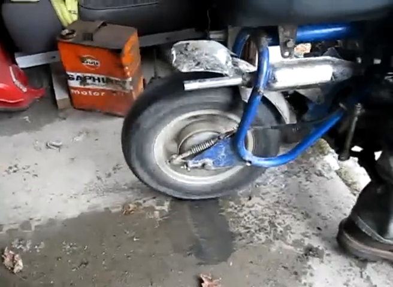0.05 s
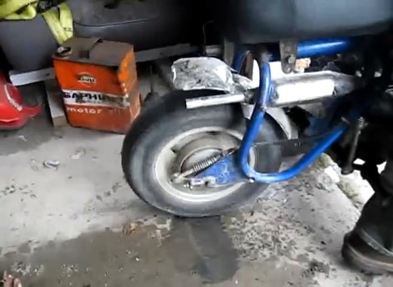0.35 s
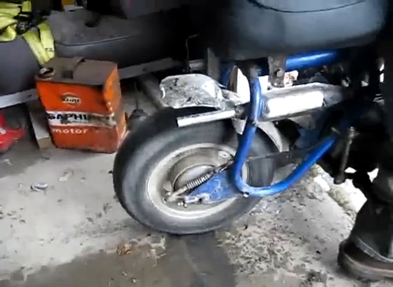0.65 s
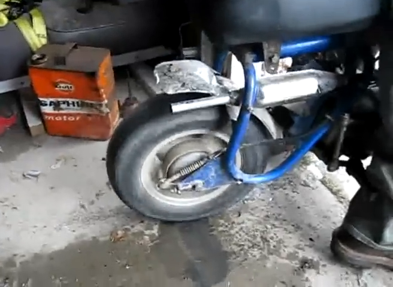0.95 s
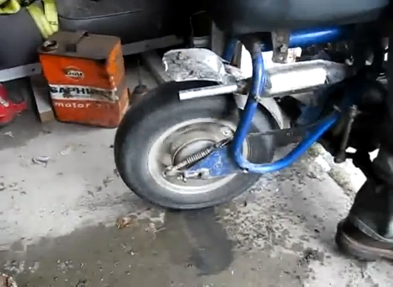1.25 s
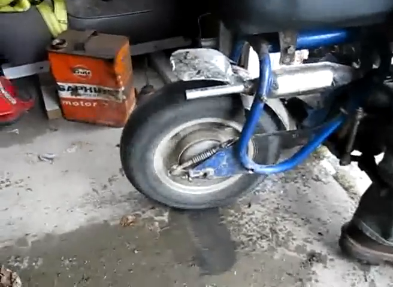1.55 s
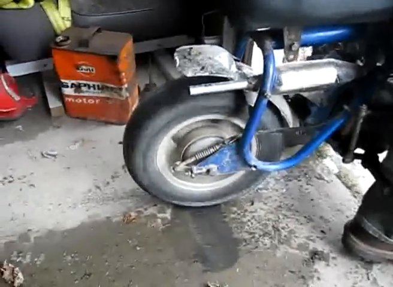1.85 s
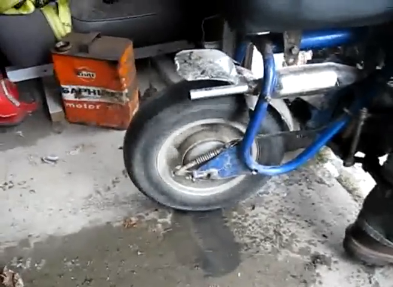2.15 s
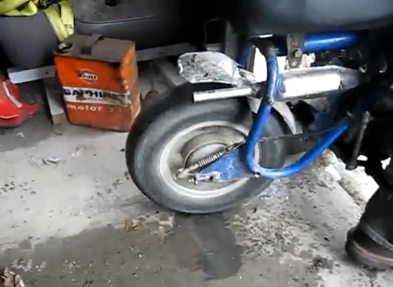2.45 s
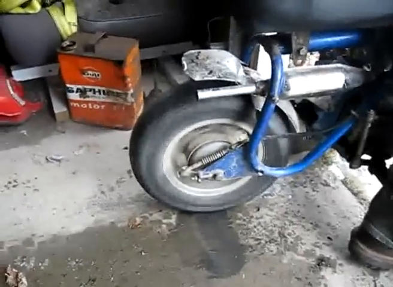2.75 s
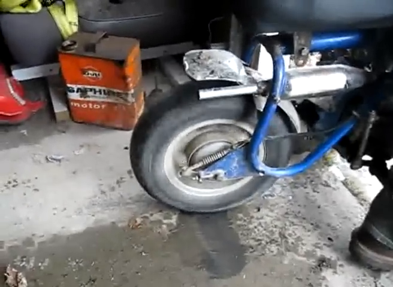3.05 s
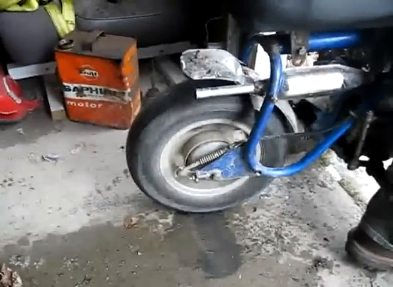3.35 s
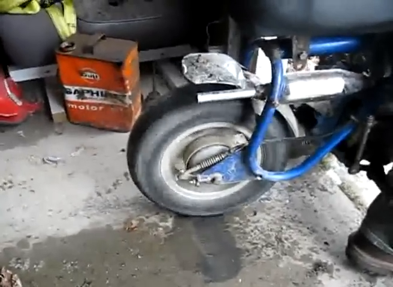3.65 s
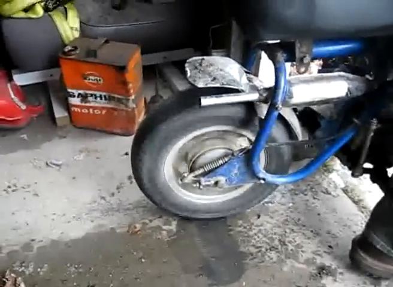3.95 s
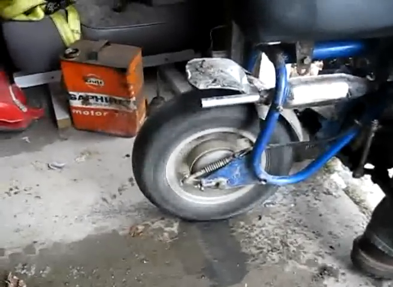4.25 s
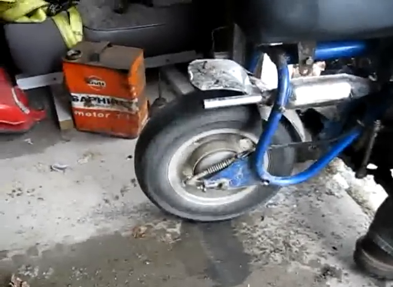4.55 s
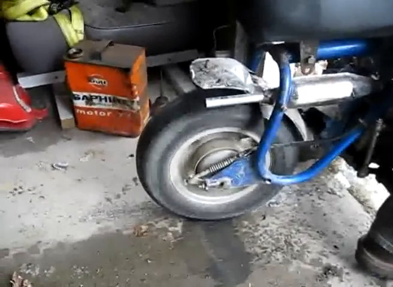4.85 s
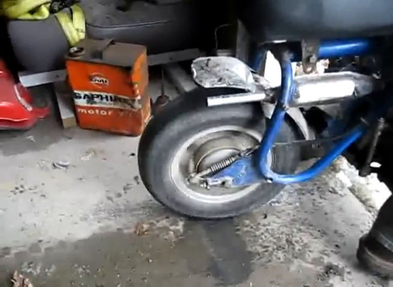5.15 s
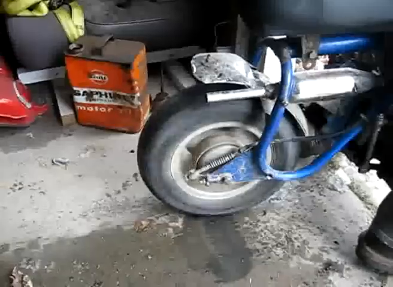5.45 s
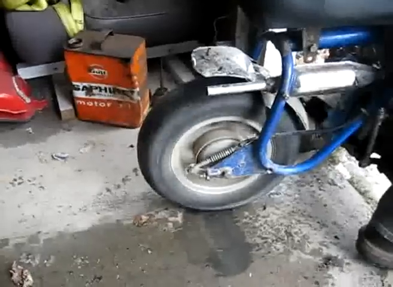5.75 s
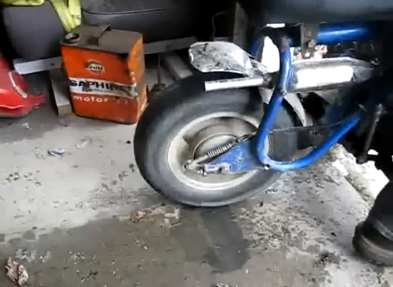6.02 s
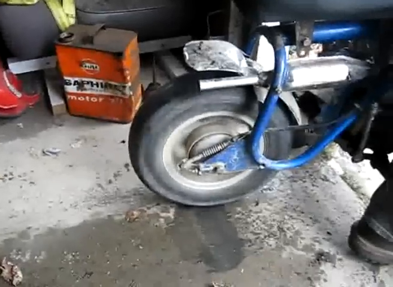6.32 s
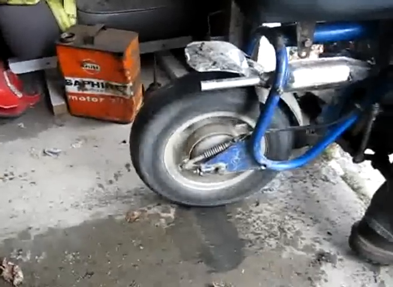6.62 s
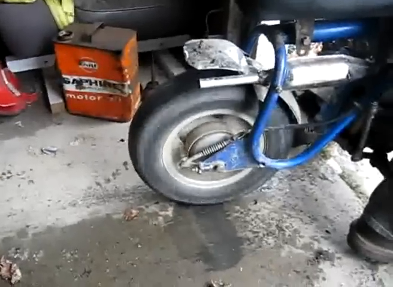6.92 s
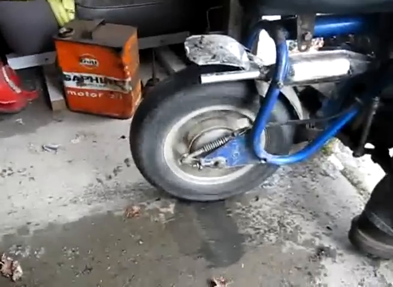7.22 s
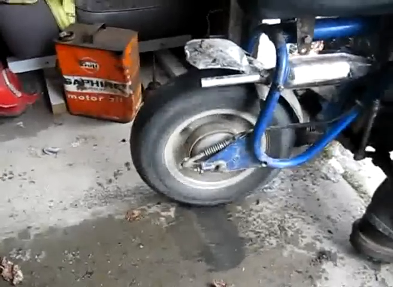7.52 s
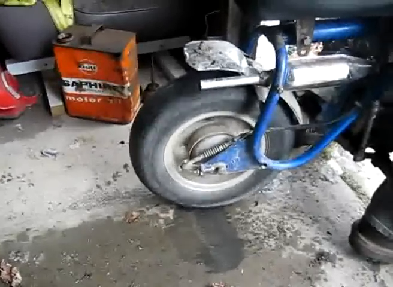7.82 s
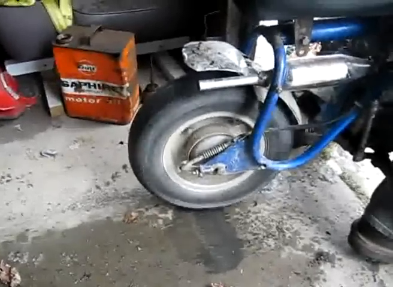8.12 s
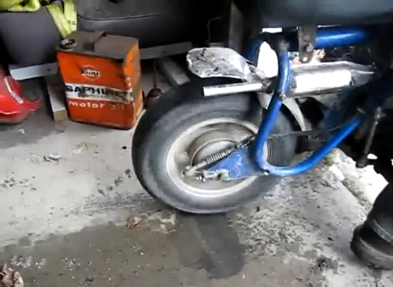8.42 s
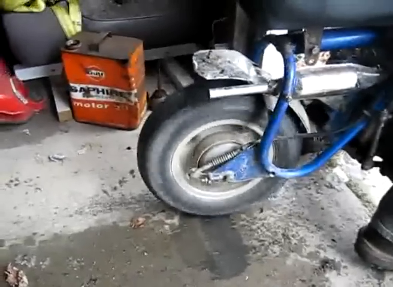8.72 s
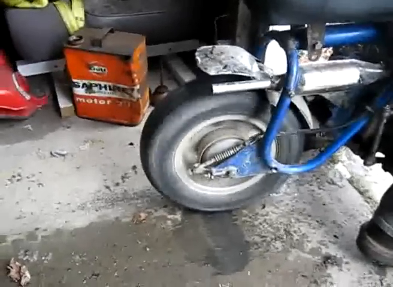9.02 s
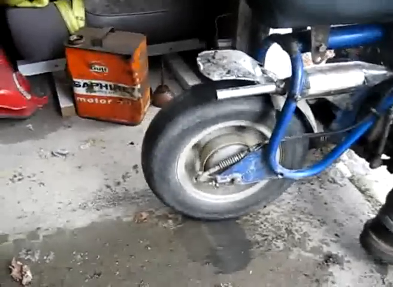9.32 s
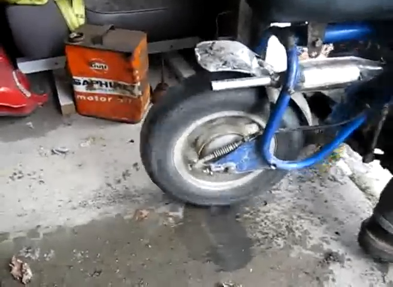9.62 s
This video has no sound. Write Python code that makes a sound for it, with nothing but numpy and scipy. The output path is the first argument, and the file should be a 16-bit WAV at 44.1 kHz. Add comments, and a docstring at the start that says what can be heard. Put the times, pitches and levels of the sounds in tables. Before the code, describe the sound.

A small single-cylinder minibike engine revs high with exhaust pops while its spinning rear tire hisses on wet concrete.

```python
"""A minibike's small four-stroke single is held at high revs while its rear tyre spins on wet concrete.
From the start each firing drives the exhaust note, a puff of gas and a run of valve and piston knocks.
The revs climb for four seconds, and the intake honks as harmonics meet its resonances. From two seconds
on, stray charges pop loudly in the pipe; they keep popping as the revs sag to the end. A small camera
close by takes it all in through a narrow, slightly hissy channel."""
import sys
import numpy as np
from scipy import signal
from scipy.fft import rfft, irfft, next_fast_len
from scipy.io import wavfile
from scipy.ndimage import uniform_filter1d

SR = 44100
rng = np.random.default_rng(int(sys.argv[2]) if len(sys.argv) > 2 else 0)


def master_out(mix):
    """Clip the mix to full scale and print it as 16-bit PCM to the path in sys.argv[1]."""
    frames = np.transpose(np.atleast_2d(mix))
    ceiling = np.clip(frames, -1, 1)
    pcm = np.round(ceiling * 32767).astype(np.int16)
    wavfile.write(sys.argv[1], SR, pcm)


N = 431298
TIME = np.arange(N) / SR
CRUISE_HZ = 67  # middle of the range of firing rates


def undb(db):
    """Decibels to amplitude ratio."""
    return 10 ** (np.asarray(db) / 20)


def unit(x):
    """Normalisation to rms 1."""
    return x / np.sqrt(np.mean(x ** 2))


def walk(rate_hz):
    """Low-pass random fluctuation: held values, smoothed twice; spread near 1."""
    hold = int(SR / rate_hz)
    steps = np.repeat(rng.standard_normal(N // hold + 1), hold)
    return 1.3 * uniform_filter1d(uniform_filter1d(steps, hold), hold)[:N]


def colour(x, spectrum):
    """Spectral shaping through (frequency_hz, gain_db) points; rms 1."""
    hz, db = np.transpose(spectrum)
    size = next_fast_len(N)
    bins_hz = np.arange(size // 2 + 1) * SR / size
    gain = undb(np.interp(np.log(bins_hz + 1), np.log(hz), db))
    return unit(irfft(rfft(x, size) * gain, size)[:N])


def ring(x, modes):
    """Modal superposition: damped resonances, neighbours in opposite sign; rms 1."""
    return unit(sum((-1) ** k * undb(db) * signal.lfilter(*signal.iirpeak(hz, hz / width, fs=SR), x)
                    for k, (hz, width, db) in enumerate(modes)))


def response(hz, modes):
    """Magnitude response of steep-sided resonances, summed in power."""
    return np.sqrt(sum((undb(db) / (1 + ((hz - f) / width) ** 4)) ** 2 for f, width, db in modes))


def clicks(times, sizes):
    """Impulse train; linear interpolation shares each impulse between two samples."""
    at = np.clip(times * SR, 0, N)
    i = at.astype(int)
    before = np.bincount(i, sizes * (1 - at + i), N + 2)
    after = np.bincount(i + 1, sizes * (at - i), N + 2)
    return (before + after)[:N]


# Spectrum of the wet tyre: frequency_hz, gain_db
TYRE_SPECTRUM = [(30, -12), (150, -8), (400, -11), (800, -6), (1200, -3), (1800, -0.5), (2450, 2.5),
                 (2950, 2.5), (3550, -2), (4000, 1.5), (4700, -1), (5300, -2.5)]


def tyre(grain_db=0.7, wander_db=0.8):
    """Friction noise: rubber scrubs over wet grit in a dense, grainy hiss."""
    noise = rng.standard_normal(N)
    roughness = undb(-grain_db * walk(900) + wander_db * walk(12))
    return colour(noise * roughness, TYRE_SPECTRUM)


# Crack of the opening valve and its reflections in the silencer: delay_s, relative_pressure
VALVE_CRACKS = [(.0002, 1), (.0023, -.9), (.0036, .9), (.0046, -.9), (.0065, .6), (.0093, -.45)]
# Spectrum of the exhaust gas: frequency_hz, gain_db
JET_SPECTRUM = [(150, -1), (400, 6), (800, 6), (1200, -10.5), (1700, -21.5), (2500, 4.5), (2900, -1.5),
                (3450, 7), (4100, 9.5), (4750, -9), (5300, 4.5)]
# Modes of the silencer's thin steel: frequency_hz, bandwidth_hz, gain_db
SILENCER_MODES = [(3316, 48, 3.5), (3605, 100, 2), (4330, 66, 1), (4606, 107, 5.5), (4843, 74, 6.5),
                  (5100, 310, -1.5)]


def exhaust_gas(cycles, firings, open_share=0.05, fade_share=0.35, steel_db=-5, crack_db=-5):
    """Jet noise: once a cycle the valve cracks open and a puff of gas dies away; both ring the steel."""
    age = cycles % 1
    puff = unit((1 - np.exp(-age / open_share)) * np.exp(-.5 * (age / fade_share) ** 2))
    crack = 0
    for delay_s, pressure in VALVE_CRACKS:
        drift_s = .00002 * np.interp(firings, TIME, walk(3))  # the speed of sound varies in hot gas
        crack += clicks(firings + delay_s + drift_s, pressure)
    tailpipe = signal.butter(4, 1000, "high", fs=SR, output="sos")  # narrow: passes only the sharp edge
    crack = undb(crack_db) * unit(signal.sosfilt(tailpipe, crack))
    jet, shell = puff * rng.standard_normal((2, N)) + crack
    return colour(jet, JET_SPECTRUM) + undb(steel_db) * ring(shell, SILENCER_MODES)


# Knocks after the exhaust valve opens: delay_cycles, level_db
CYCLE_KNOCKS = [(.01, 6), (.135, 0), (0.291, 3), (.37, -2.5), (0.689, 2), (.83, 0.5)]
# Modes of crankcase, fins and chain guard: frequency_hz, bandwidth_hz, gain_db
CASING_MODES = [(1611, 133, -10), (1715, 117, -6), (2033, 173, -4.5), (2142, 68, 2.5), (2250, 46, 2),
                (2419, 116, -1), (2596, 148, -3.5), (2695, 11.7, 3), (2730, 210, -12), (3626, 49, -2)]
# Brief swells of the metallic ring: peak_s, half_length_s, gain_db
RING_SWELLS = [(3.81, 0.12, 2), (4.88, 0.17, 2), (6.127, 0.044, 3), (9.3, 0.33, 1.5)]


def clatter(firings, periods, scatter_db=0.7, jitter_s=2e-5, drift_s=5e-5, rattle_db=-8, rattle_s=.0018):
    """Impact excitation: valve gear and piston ring the casing; each knock trails a short rattle."""
    blows = 0
    for share, db in CYCLE_KNOCKS:
        late, size = rng.standard_normal((len(firings), 2)).T
        play_s = drift_s * np.interp(firings, TIME, walk(3))  # the parts drift within their clearance
        strikes = firings + share * periods + play_s + jitter_s * late
        blows += clicks(strikes, undb(db + scatter_db * size))
    decay = signal.lfilter([1], [1, -np.exp(-1 / (rattle_s * SR))], blows)
    rattle = decay * rng.standard_normal(N)
    swell_db = sum(db * np.exp(-((TIME - s) / length) ** 2) for s, length, db in RING_SWELLS)
    return undb(swell_db) * ring(unit(blows) + undb(rattle_db) * unit(rattle), CASING_MODES)


# Typical strength of the small misfires: time_s, relative_level_db
SMALL_POPS = [(0, -35), (1.7, -44), (2.3, -28.5), (3.7, -27), (4.8, -29.5), (5.9, -29), (6.8, -31.5),
              (7.7, -31.5), (8.7, -28), (9.78, -26)]
# Loud pops, each moved to the nearest firing: start_s, relative_level_db
LOUD_POPS = [(2.027, -23), (2.723, -25.5), (2.962, -23.5), (3.185, -31.5), (3.716, -23.5), (3.924, -38),
             (4.302, -23), (4.956, -22), (6.06, -19), (7.015, -24.5), (8.264, -19), (8.465, -27),
             (8.916, -21), (9.463, -22.5)]
# Pressure wave of a pop, out of the pipe and back: delay_s, width_s, relative_pressure
POP_PULSES = [(.0016, 0.0013, -1.13), (.0034, 0.00017, -0.7), (.0076, .0013, 0.27)]


def afterfire(firings, spread_db=3, ceiling_db=-24, chance=0.55, late_s=0.00152, crack_db=-11):
    """Impulsive combustion: unburnt charges go off in the pipe, each a thump with a short crack."""
    small_db = np.interp(firings, *np.transpose(SMALL_POPS))
    sizes = undb(np.minimum(small_db + spread_db * rng.standard_normal(len(firings)), ceiling_db))
    sizes *= rng.random(len(firings)) < chance
    for start_s, db in LOUD_POPS:
        sizes[np.argmin(abs(firings - start_s))] = undb(db)
    t = TIME[:SR // 50]
    wave = sum(pressure * np.exp(-.5 * ((t - delay) / width) ** 2)
               for delay, width, pressure in POP_PULSES)
    ignitions = firings + late_s * rng.exponential(size=len(firings))
    thumps = signal.fftconvolve(clicks(ignitions, sizes), wave)[:N]
    crack = colour(rng.standard_normal(N), [(300, 7), (900, -12), (5000, -51)])
    return thumps * (1 + undb(crack_db) * crack)


# Standing waves of the exhaust pipe: frequency_hz, half_width_hz, gain_db
PIPE_MODES = [(120.4, 33, -33), (255.4, 15.7, -33.5), (288.6, 8.7, -40), (504.4, 34, -33.5),
              (578, 32, -30.5), (631.5, 26, -30), (734, 30, -31), (818, 35, -34.5), (908, 41, -37),
              (1310, 15, -59), (1464, 31, -41.5)]
# Resonances of the air box and inlet: frequency_hz, half_width_hz, gain_db
AIRBOX_MODES = [(336.5, 13.1, -33.5), (409.6, 17.54, -23.5), (444, 6, -30.5), (482, 27.3, -26.5)]


def engine_note(hz, cycles, boom_waver_db=1, honk_waver_db=1, growl_waver_db=2.5, harmonics=23):
    """Forced resonance: each harmonic of the firing rate swells as it crosses a pipe or air box mode."""
    exhaust_at, intake_at, dispersion = .4, .84, .1082  # shares of a cycle
    even_db, growl_db_per_hz = -4, -0.47
    rates = np.linspace(hz.min(), hz.max(), 200)
    note = 0
    for k in range(1, harmonics + 1):
        if k <= 4:  # boom: the exhaust pulse itself
            modes, lag, db = PIPE_MODES, exhaust_at * k, boom_waver_db * walk(6.3)
        elif k <= 7:  # honk: in phase on the intake stroke, so it throbs once a cycle
            modes, lag, db = AIRBOX_MODES, intake_at * k, honk_waver_db * walk(7)
        else:  # growl: the baffles spread it over the cycle and weaken its even harmonics
            modes, lag = PIPE_MODES, exhaust_at * k + dispersion * (k - 11) ** 2 / 2
            db = growl_waver_db * walk(7) + even_db * (k % 2 == 0)
            db += growl_db_per_hz * (hz - CRUISE_HZ)  # harder as the engine is dragged down
        leak = undb(-52.5 + 2 * np.log2(k))  # floor between the modes, rising 2 dB per octave
        resonance = np.interp(hz, rates, np.hypot(response(k * rates, modes), leak))
        note += undb(db) * resonance * np.sqrt(2) * np.cos(2 * np.pi * (k * cycles - lag))
    return note


# Engine speed, set by the throttle and the slip of the tyre: time_s, firing_rate_hz
FIRING_RATE = [(0.0, 62.6), (0.24, 63.1), (0.43, 64.2), (1.01, 65.5), (1.22, 66.8), (1.93, 69.4),
               (2.34, 70.5), (2.56, 70.3), (2.8, 71.4), (3.13, 71.7), (3.49, 71.4), (3.84, 72.1),
               (5.56, 68.5), (5.86, 68.8), (6.04, 68.3), (6.21, 67.3), (6.37, 67.5), (6.65, 66.7),
               (7.3, 66.7), (7.71, 65.3), (8.33, 64.6), (8.8, 64.5), (9.64, 63.4), (9.78, 63.6)]


def scene():
    """Superposition: one crank times note, knocks, gas and pops over the hiss of the tyre."""
    hz = np.interp(TIME, *np.transpose(FIRING_RATE))
    cycles = np.cumsum(hz) / SR
    firings = np.interp(np.arange(1, int(cycles[-1]) + 1), cycles, TIME)
    periods = 1 / np.interp(firings, TIME, hz)
    excess_hz = hz - CRUISE_HZ  # tyre and clatter grow with speed; the gas, as the engine labours
    out = undb(-16.5 + 0.21 * excess_hz) * tyre()
    out += undb(-19 - 0.1 * excess_hz) * exhaust_gas(cycles, firings)
    out += undb(-20.5 + 0.25 * excess_hz) * clatter(firings, periods)
    out += undb(5) * afterfire(firings)
    out += engine_note(hz, cycles)
    return out[None]


def record(dry, channel_hz=5240, saturation=.52, hiss_db=-54, hiss_top_hz=15700):
    """Band limiting and saturation: the camera rounds the peaks; its faint hiss follows the amplitude."""
    sound = signal.sosfilt(signal.ellip(9, .3, 70, channel_hz, fs=SR, output="sos"), dry)
    sound = sound / (1 + (sound / saturation) ** 4) ** .25
    band_edge = signal.firwin(401, channel_hz + 120, window="blackman", fs=SR)
    sound = signal.fftconvolve(sound, band_edge[None], "same")
    hiss = undb(hiss_db) * unit(abs(sound) * rng.standard_normal(N))
    return signal.sosfilt(signal.ellip(10, .2, 70, hiss_top_hz, fs=SR, output="sos"), sound + hiss)


dry = scene()
out = record(dry)
master_out(out)
```